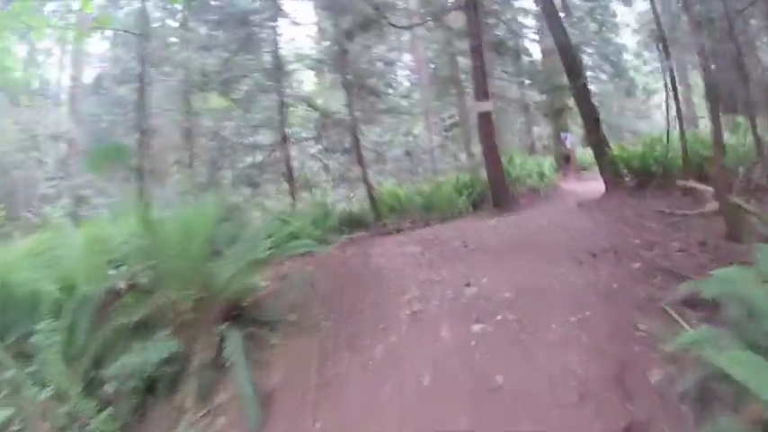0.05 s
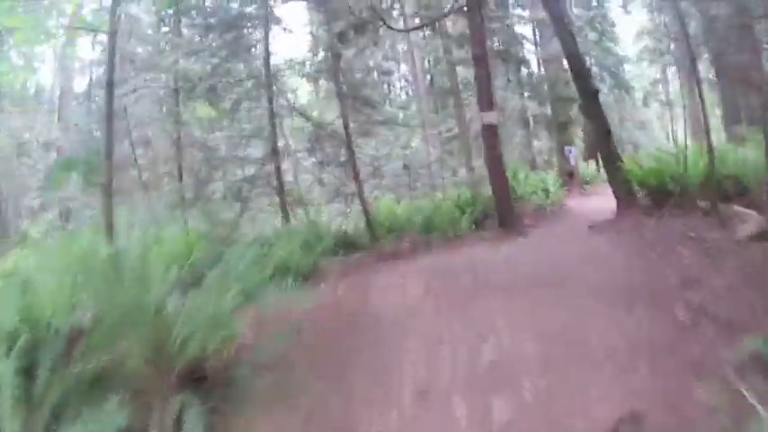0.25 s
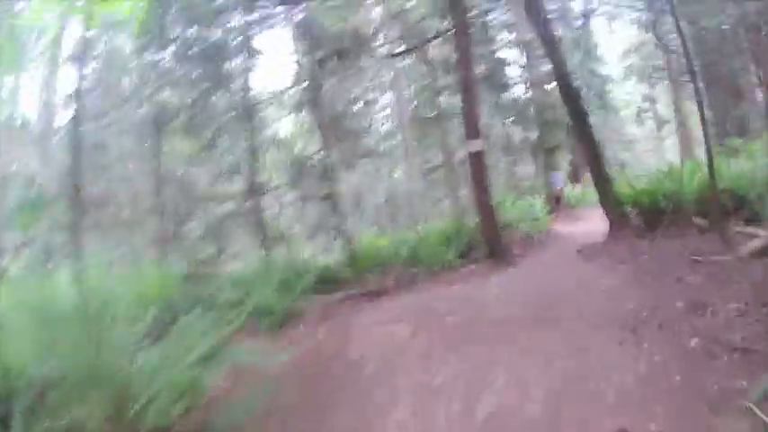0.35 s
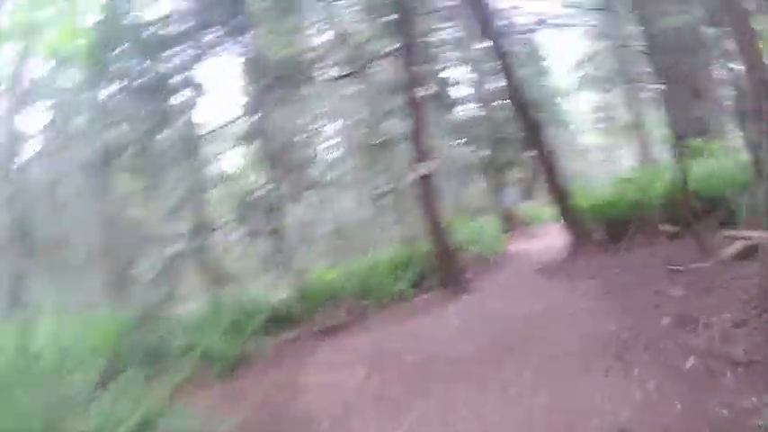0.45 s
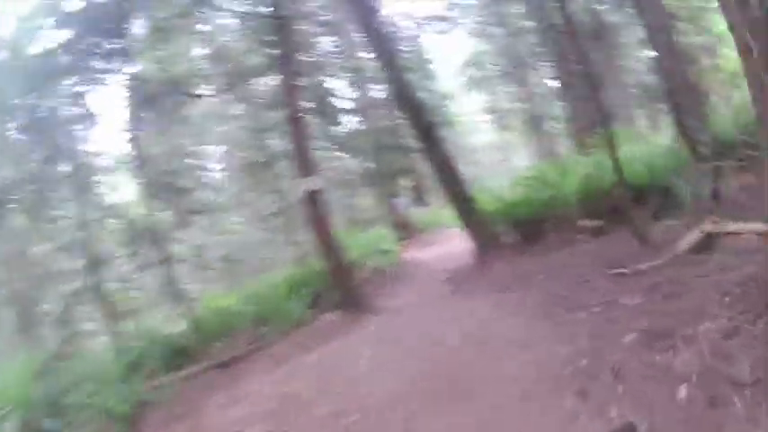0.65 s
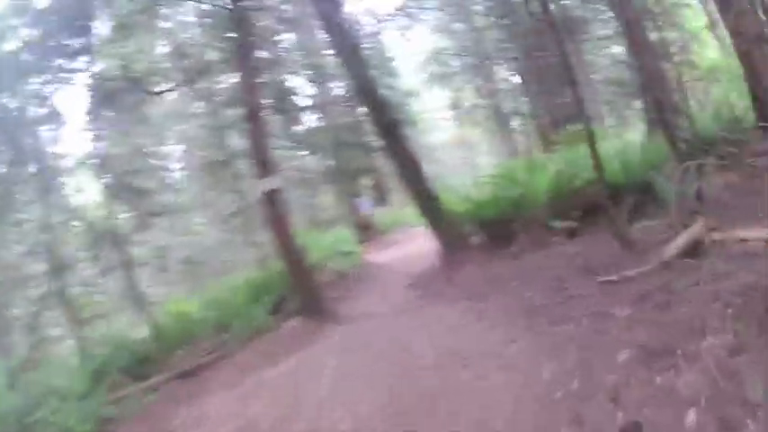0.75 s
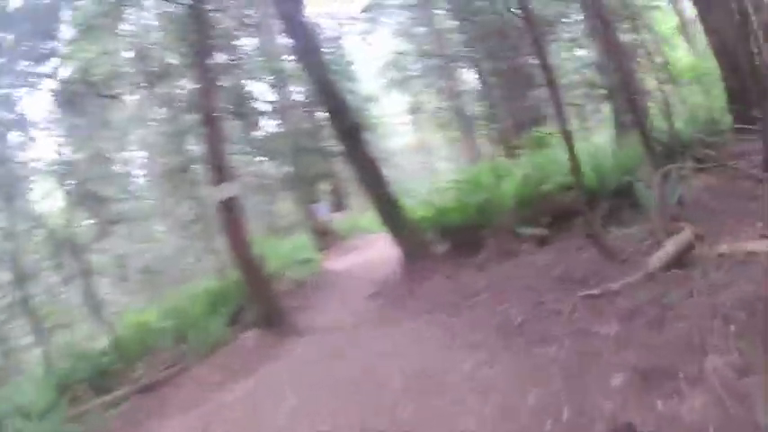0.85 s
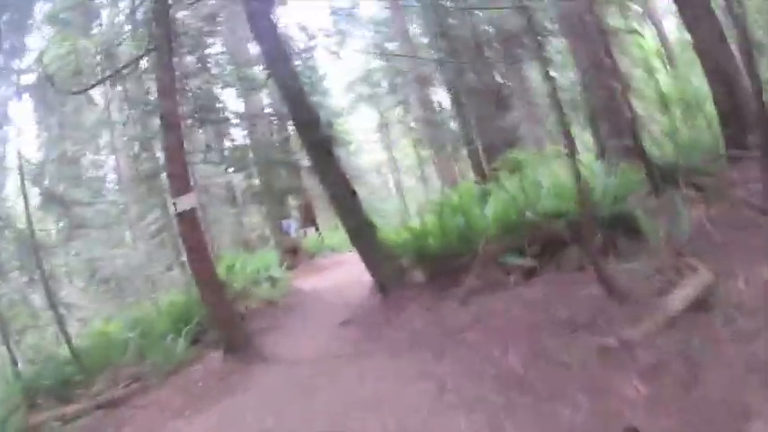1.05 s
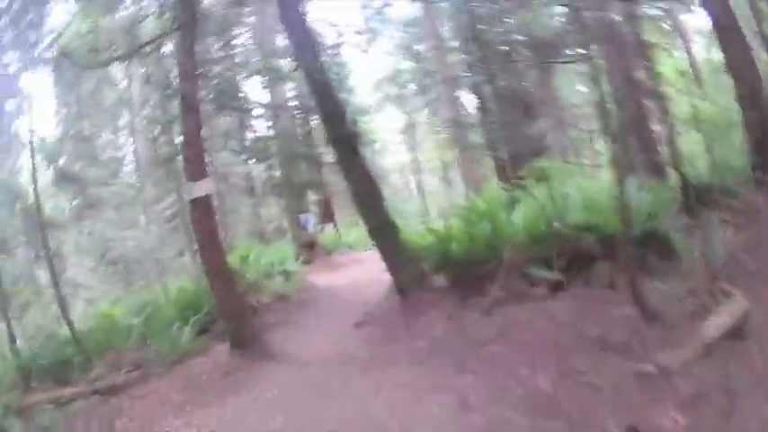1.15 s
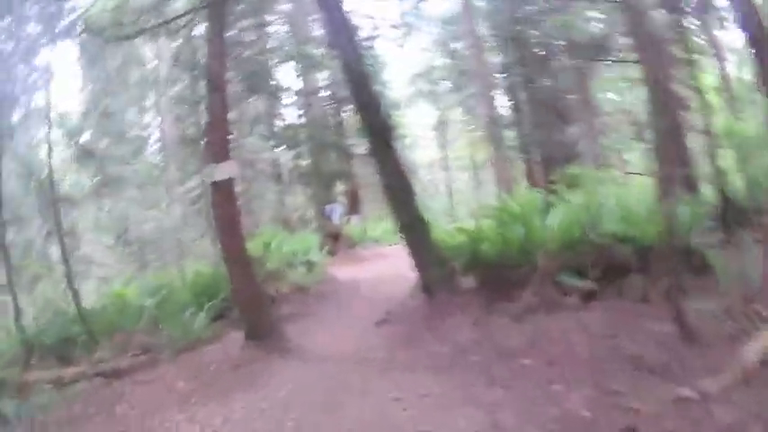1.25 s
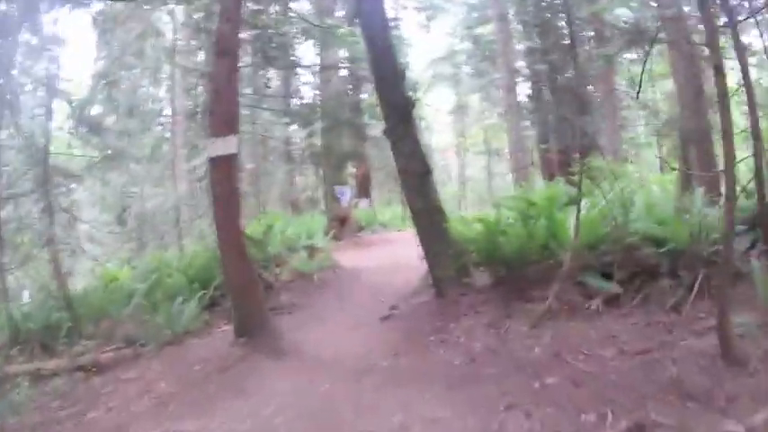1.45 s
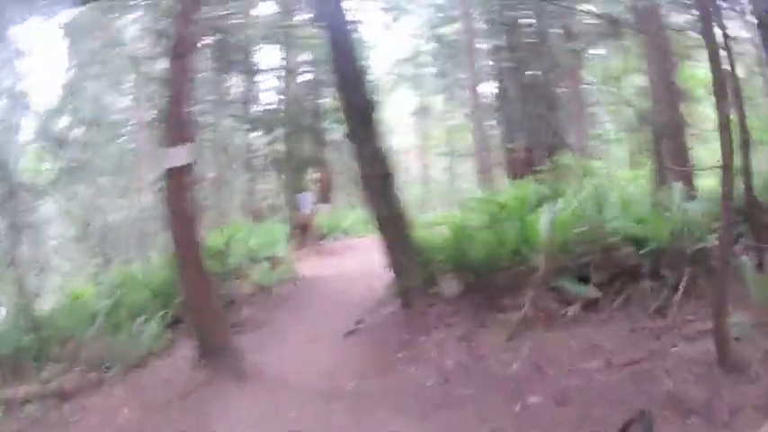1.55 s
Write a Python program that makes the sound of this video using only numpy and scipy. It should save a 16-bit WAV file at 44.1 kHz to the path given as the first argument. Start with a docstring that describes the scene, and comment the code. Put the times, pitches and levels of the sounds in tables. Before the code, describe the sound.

Heard from a microphone riding along, a mountain bike rumbles over a packed forest trail. Bumps set off three sharp plastic knocks, small stones snap under the softly hissing tyres, and the bike rolls on more quietly.

```python
"""A mountain bike rolls down a packed dirt trail, heard from a microphone that rides along.
From the start the tyres hiss over grit and shake the bike and the microphone's mount into a rumble.
Bumps soon set off three hard plastic knocks, the loudest at about half a second. Light ticks and
dry snaps of small stones follow until about one second. Then the bike rumbles on with a few
soft thuds and pings of grit, and one faint knock comes just before the end."""
import sys
import numpy as np
from scipy import signal
from scipy.fft import rfft, irfft
from scipy.io import wavfile
from scipy.ndimage import uniform_filter1d

SR = 44100
rng = np.random.default_rng(int(sys.argv[2]) if len(sys.argv) > 2 else 0)


def materialize(psi):
    """Save the field psi as 16-bit PCM at rate SR to the path in sys.argv[1].

    A 1-D psi becomes a single channel; in a 2-D psi each row is a channel.
    """
    bounded = np.clip(np.atleast_2d(psi).T, -1, 1)
    quanta = np.round(bounded * 32767).astype(np.int16)
    wavfile.write(sys.argv[1], SR, quanta)


N = 70560
TIME = np.arange(N) / SR

# tone of a plastic part's sharp crack: pitch_hz, level_db
CRACK_TONE = [(300, -18), (1000, -5), (1700, -9), (2800, -9), (5000, -0.5), (6000, -13), (8000, -15),
              (10000, -25), (16000, -20)]
# tone of loose parts buzzing after a blow: pitch_hz, level_db
BUZZ_TONE = [(300, 3), (700, -7.5), (1000, -3.5), (1700, -6), (2850, 3.5), (3400, -2), (4100, 0.5),
             (5100, -0.5), (5900, -11.5), (7500, -8), (9800, -16), (12000, -21), (16000, -19)]


def from_db(db):
    """Turn decibels into a number to multiply by."""
    return 10 ** (np.asarray(db) / 20)


def unit_level(x):
    """Scale a signal to an average (rms) level of 1."""
    return x / np.sqrt(np.mean(x ** 2) + 1e-20)


def level_curve(points):
    """Loudness over time, joining (time_s, level_db) points."""
    return from_db(np.interp(TIME, *np.transpose(points)))


def drift(rate_hz):
    """A smooth random wobble, about 1 in size."""
    r = np.exp(-80 * np.pi * rate_hz / SR)
    slow = signal.lfilter([1], [1, -2 * r, r * r], rng.standard_normal(N // 40 + 2002))[2000:]
    return np.interp(np.arange(N) / 40, np.arange(len(slow)), unit_level(slow))


def with_tone(x, tone):
    """Make each pitch as strong as a tone table says; overall level 1."""
    hz, db = np.transpose(tone)
    f = np.maximum(np.arange(N // 2 + 1) * SR / N, 1)
    gain = from_db(np.interp(np.log(f), np.log(hz), db)) * np.minimum(f / hz[0], 1) ** 2
    return unit_level(irfft(rfft(x) * gain, N))


def noise(tone):
    """Noise with the given tone, at level 1."""
    return with_tone(rng.standard_normal(N), tone)


def steady(x, samples):
    """Hold the running level of a signal at 1."""
    return x / np.sqrt(np.maximum(uniform_filter1d(x * x, samples), 0) + 1e-12)


def fade(start_s, fade_s):
    """Jump to 1 at start_s, then fall by 60 dB every fade_s."""
    return (TIME >= start_s) * from_db(-60 * np.clip((TIME - start_s) / fade_s, 0, 3))


def strike(start_s, notes, pitch=1):
    """One blow sets a part's own notes ringing, neighbours swinging opposite ways."""
    out, start = np.zeros(N), int(start_s * SR)
    t = TIME[:min(N - start, SR // 4)]
    for k, (hz, db, fade_s) in enumerate(notes):
        swing = (-1) ** k * from_db(db + rng.normal()) * np.exp(-np.log(1000) * t / fade_s)
        out[start:start + len(t)] += swing * np.sin(2 * np.pi * hz * pitch * t)
    return out


def burst(start_s, tone, db, fade_s):
    """A burst of noise that dies away."""
    return noise(tone) * from_db(db) * fade(start_s, fade_s)


def knocks():
    """Hard plastic close to the microphone cracks and rings, and loose parts buzz after it."""
    # the blows: start_s, level_db, pitch_ratio, buzz_db
    blows = [(0.2995, -3.5, 1, -29.5), (0.351, -6.5, 1, -30.5), (0.5339, 0.5, 0.99, -28.5),
             (1.5588, -27.5, 0.95, -22)]
    # ringing of the plastic: pitch_hz, level_db, fade_s
    notes = [(473, -25.5, 0.027), (710, -33, 0.014), (932, -20, 0.018), (1190, -15.5, 0.012),
             (1570, -23.5, 0.015), (2480, -6, 0.0077), (2879, -4, 0.013), (4000, -20, 0.017),
             (4886, -20, .017), (5210, -22.5, 0.017), (6690, -20, .012), (8900, -32, 0.018),
             (10610, -26.5, 0.011), (12430, -30, 0.017), (14300, -28.5, 0.0082)]
    out = 0
    for start_s, db, pitch, buzz_db in blows:
        ring = strike(start_s, notes, pitch)
        crack = burst(start_s, CRACK_TONE, db=-18.5, fade_s=0.024)
        buzz = burst(start_s, BUZZ_TONE, db=buzz_db, fade_s=0.062)
        out += from_db(db) * (ring + crack + buzz)
    return out


def stone_snaps():
    """Small stones snap under the tyres with hardly any ring."""
    # the snaps: start_s, level_db, buzz_db
    snaps = [(0.5713, -19, -17.5), (.7818, -27, -28), (0.805, -16, -28), (0.9609, -39, -15.5)]
    # very short ring of a stone: pitch_hz, level_db, fade_s
    notes = [(1860, -5, 0.0042), (2430, 0.5, 0.0034), (3860, -3.5, 0.0023), (5540, -21, 0.0012),
             (9000, -18, 0.0008), (13000, -22, .001)]
    # tone of a stone's crack: pitch_hz, level_db
    tone = [(900, -23), (1800, 5.5), (2600, 3), (4000, 0.5), (5500, -15), (8000, -23), (12000, -28),
            (16000, -26)]
    out = 0
    for start_s, db, buzz_db in snaps:
        ring = strike(start_s, notes)
        crack = burst(start_s, tone, db=-11, fade_s=0.0088)
        buzz = burst(start_s, BUZZ_TONE, db=buzz_db, fade_s=0.046)
        out += from_db(db) * (ring + crack + buzz)
    return out


def ticks():
    """A lighter loose part taps with a higher ring."""
    # the taps: start_s, level_db, pitch_ratio
    taps = [(.4372, -20.5, 0.98), (0.7678, -21, 0.95), (0.9214, -24, 0.94)]
    # ringing of the light part: pitch_hz, level_db, fade_s
    notes = [(568, -18.5, 0.024), (1170, -23.5, 0.042), (2917, -12, 0.019), (3190, -21, 0.055),
             (3794, -3, 0.01), (4274, -3, 0.008), (5180, -13.5, 0.01), (7950, -19, 0.0077),
             (12140, -23, 0.0071), (15200, -31, .006)]
    out = 0
    for start_s, db, pitch in taps:
        ring = strike(start_s, notes, pitch)
        crack = burst(start_s, CRACK_TONE, db=-16.5, fade_s=0.0031)
        buzz = burst(start_s, BUZZ_TONE, db=-17.5, fade_s=0.027)
        out += from_db(db) * (ring + crack + buzz)
    return out


def mount_rumble():
    """The microphone's mount shakes at its own low, wavering note."""
    # strength of the shaking: time_s, level_db
    shaking = [(0, -59), (.05, -44), (.12, -47), (.165, -60), (.212, -33.5), (.266, -58), (.31, -34),
               (.386, -59), (.43, -31.5), (.52, -57), (.6, -53), (.664, -42.5), (.715, -53.5), (.79, -31.5),
               (.87, -40), (.952, -52), (.985, -37.5), (1.11, -47.5), (1.16, -39.5), (1.29, -54.5),
               (1.37, -41), (1.46, -42.5), (1.56, -43.5), (1.6, -58)]
    pitch_hz = 95.67 + 6.5 * drift(rate_hz=34)
    flutter = from_db(2 * drift(rate_hz=30))
    sway = np.sin(2 * np.pi * np.cumsum(pitch_hz) / SR)
    return level_curve(shaking) * unit_level(sway * flutter)


def frame_drumming():
    """The tyres drum through the frame, which booms around its own notes."""
    # strength of the drumming: time_s, level_db
    drumming = [(0.0, -55), (0.132, -44), (0.458, -41.5), (0.516, -43.5), (0.538, -41), (0.588, -49.5),
                (0.68, -40.5), (0.694, -49.5), (0.828, -40), (0.86, -51.5), (0.886, -42), (0.952, -52.5),
                (0.976, -40), (1.016, -50), (1.264, -51.5), (1.288, -43.5), (1.484, -53), (1.6, -48.5)]
    # the frame's notes: pitch_hz, width_hz, level_db
    notes = [(206.6, 42, -6.5), (265.6, 47, 2), (340, 72, -9), (458, 85, -10.5)]
    boom = 0
    for hz, width, db in notes:
        band = signal.butter(2, [hz - width / 2, hz + width / 2], "band", fs=SR, output="sos")
        boom += from_db(db) * unit_level(signal.sosfilt(band, rng.standard_normal(N + SR))[SR:])
    return from_db(-0.5) * level_curve(drumming) * steady(boom, samples=2200)


def bumps():
    """On bumps the tyres scuff and the frame thuds."""
    # tyre scuffs: start_s, level_db, pitch_ratio
    scuffs = [(0.067, -51, 0.77), (.4125, -41.5, 0.85), (0.751, -36.5, 1.02), (0.782, -48, 0.89),
              (0.97, -51, 0.94)]
    # tone of a scuff: pitch_hz, level_db
    tone = [(300, 5.5), (700, -2), (1020, 12.5), (1500, -14), (2500, -3.5), (5200, -7), (9000, -20),
            (16000, -33)]
    # frame thuds: start_s, level_db
    thuds = [(0.198, -30), (0.297, -38), (0.414, -32), (.436, -30), (.534, -30.5), (.772, -35),
             (.803, -26.5), (0.971, -49), (1.283, -40.5), (1.35, -37.5), (1.384, -41)]
    # low ring of a thud: pitch_hz, level_db, fade_s
    notes = [(95.5, -15, 0.17), (210.7, -1.5, 0.1), (296, -5, 0.021), (414, -9, 0.061)]
    scuffing = sum(burst(start_s, np.array(tone) * [pitch, 1], db, fade_s=0.057)
                   for start_s, db, pitch in scuffs)
    return scuffing + sum(from_db(db) * strike(start_s, notes) for start_s, db in thuds)


def wind():
    """Wind and ground noise make an even, low rush."""
    # tone of the rush: pitch_hz, level_db
    tone = [(20, -4.5), (40, 3.5), (65, 4.5), (110, 3.5), (160, -12), (300, -11), (500, -20.5), (680, -29),
            (1500, -61)]
    return from_db(-48) * steady(noise(tone), samples=4400)


def tyre_hiss():
    """Rubber hisses softly on dirt, with grains of grit in the sound."""
    # strength of the hiss: time_s, level_db
    loudness = [(0, -63), (.15, -63.5), (.21, -63), (.28, -60), (.45, -59), (.6, -60), (.72, -63),
                (.85, -62), (1.02, -66), (1.17, -65.5), (1.3, -63), (1.45, -64.5), (1.6, -63)]
    # tone of rubber on dirt: pitch_hz, level_db
    tone = [(500, 4.5), (700, -4.5), (1000, 5.5), (1500, -2), (1950, -1), (2250, -0.5), (2850, 4.5),
            (3250, -2.5), (3700, 2.5), (4500, 1.5), (5800, -11.5), (8000, -8.5), (9700, -22),
            (11800, -14.5), (13500, -24), (16000, -20)]
    grains_per_s, spread_db = 950, 4.5
    clicks = (rng.random(N) < grains_per_s / SR) * rng.choice([-1, 1], N)
    sizes = from_db(spread_db * np.minimum(rng.exponential(1, N), 4))
    grit = from_db(-8.5) * with_tone(clicks * sizes, tone)
    return level_curve(loudness) * (noise(tone) + grit)


def grit_pings():
    """Bits of grit ping off the frame."""
    # the hits: start_s, level_db
    hits = [(0.345, -53), (0.8577, -49), (0.9965, -51), (1.286, -47), (1.3913, -45.5)]
    # tone of a ping: pitch_hz, level_db
    tone = [(1500, -20), (3000, 0), (4200, 9), (5500, -15), (8000, -11), (10000, -21), (16000, -16)]
    return noise(tone) * sum(from_db(db) * fade(start_s, fade_s=0.0092) for start_s, db in hits)


def dirt_spray():
    """Fine dirt sprays up with a brief, high hiss."""
    # strength of the spray: time_s, level_db
    loudness = [(.14, -88), (.19, -60), (.23, -66.5), (.29, -72), (.5, -88), (.7, -86)]
    # tone of the spray: pitch_hz, level_db
    tone = [(3000, 7), (5000, 8.5), (7800, 1), (9800, -7), (12000, -8), (16000, -10)]
    return level_curve(loudness) * noise(tone)


def whines():
    """The rolling bike sings faintly: narrow bands of noise swell and fade."""
    # the whines: middle_s, length_s, pitch_hz, level_db
    swells = [(.15, 0.81, 2790, -71.5), (0.67, .09, 2463, -66), (1.39, 0.49, 1863, -73.5)]
    width_hz = 82
    out = 0
    for middle_s, length_s, hz, db in swells:
        band = signal.butter(2, [hz - width_hz / 2, hz + width_hz / 2], "band", fs=SR, output="sos")
        swell = np.exp(-2 * ((TIME - middle_s) / length_s) ** 2)
        out += from_db(db) * swell * unit_level(signal.sosfilt(band, rng.standard_normal(N)))
    return out


def scene():
    """Everything reaches one microphone."""
    rolling = dirt_spray() + mount_rumble() + frame_drumming() + wind() + tyre_hiss() + whines()
    return (rolling + bumps() + knocks() + ticks() + stone_snaps() + grit_pings())[None]


def record(dry):
    """The loudest knocks are rounded off and the highest treble is cut."""
    ceiling, cutoff_hz = 0.47, 16000
    rounded = ceiling * np.tanh(dry / ceiling)
    return signal.sosfilt(signal.ellip(10, .1, 80, cutoff_hz, fs=SR, output="sos"), rounded)


dry = scene()
out = record(dry)
materialize(out)
```